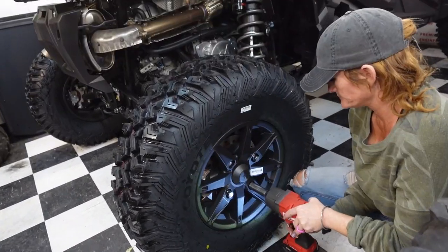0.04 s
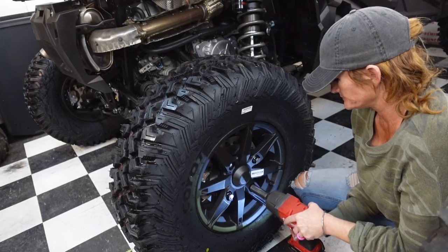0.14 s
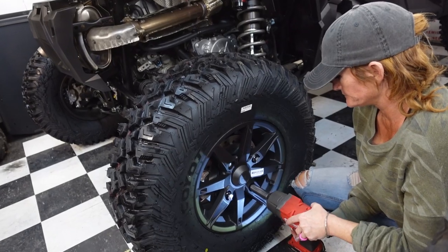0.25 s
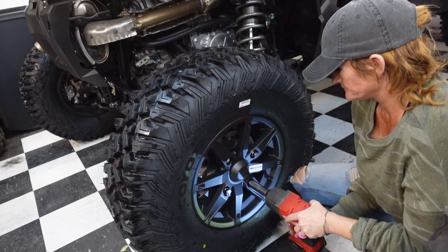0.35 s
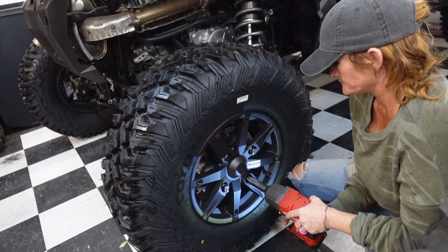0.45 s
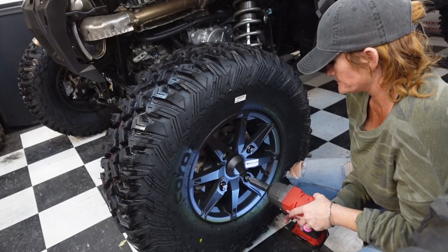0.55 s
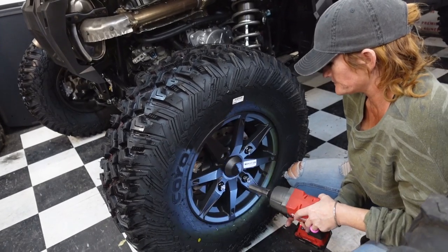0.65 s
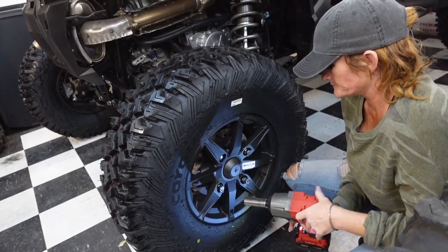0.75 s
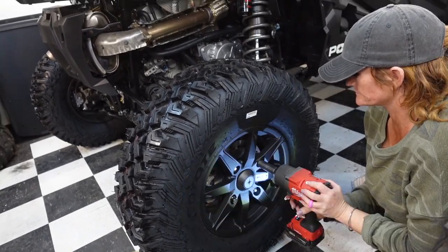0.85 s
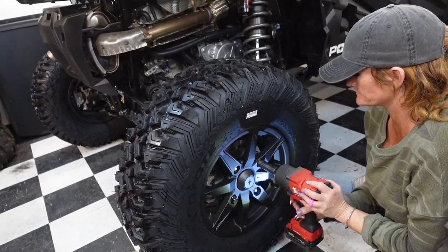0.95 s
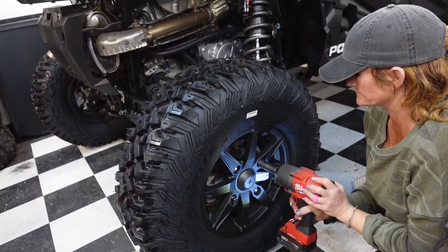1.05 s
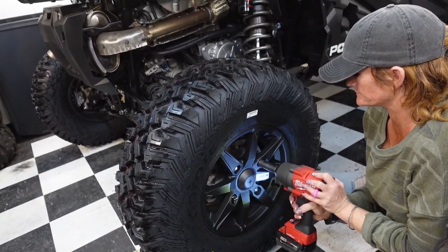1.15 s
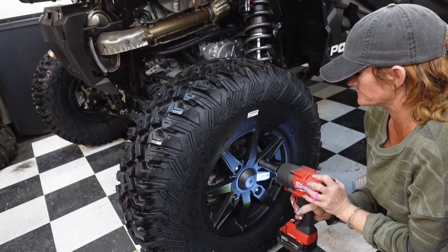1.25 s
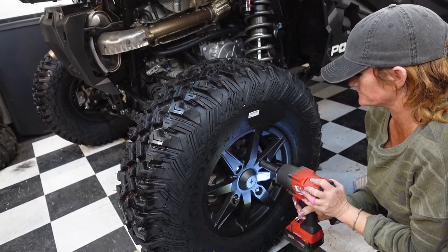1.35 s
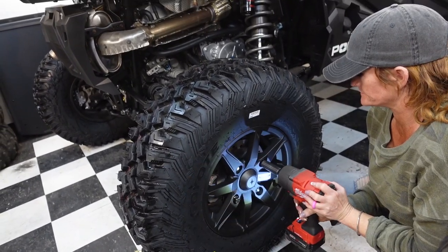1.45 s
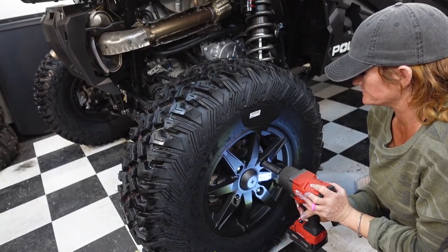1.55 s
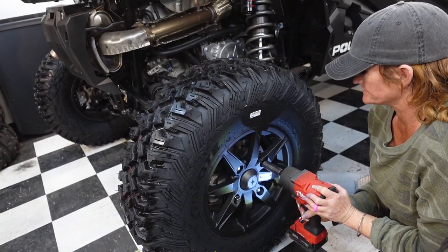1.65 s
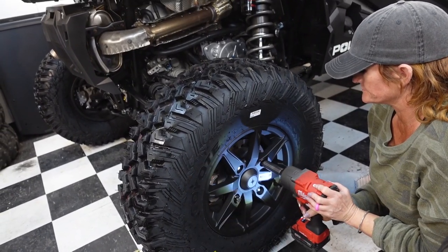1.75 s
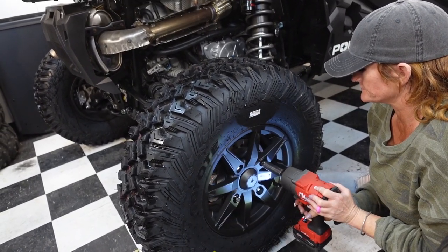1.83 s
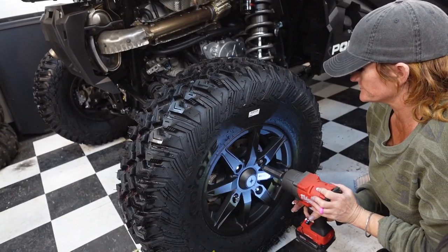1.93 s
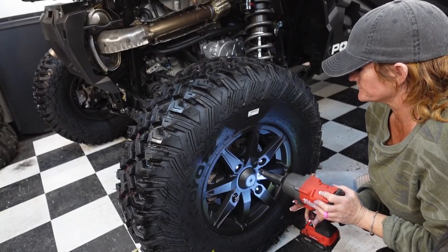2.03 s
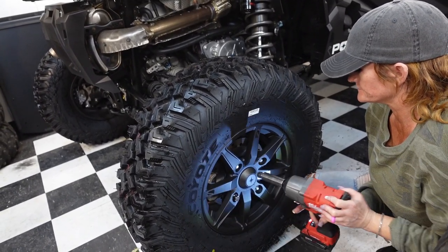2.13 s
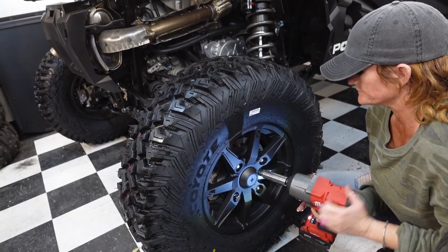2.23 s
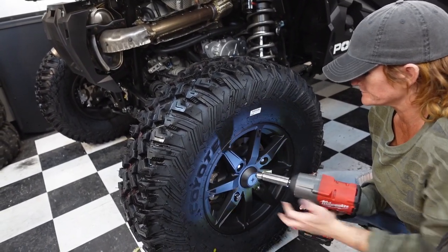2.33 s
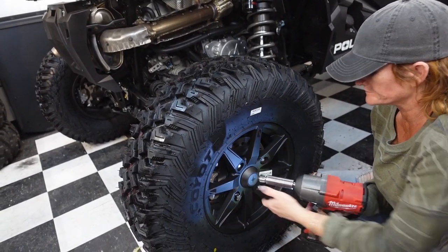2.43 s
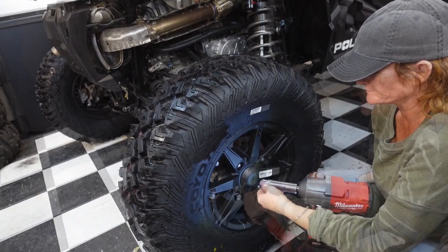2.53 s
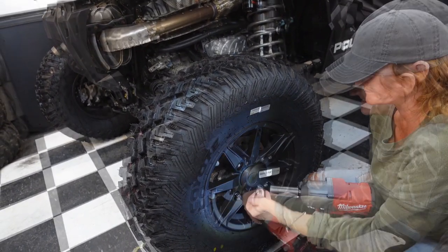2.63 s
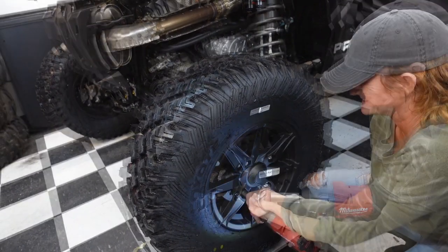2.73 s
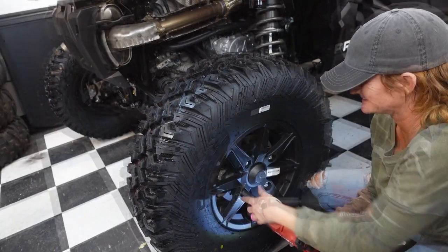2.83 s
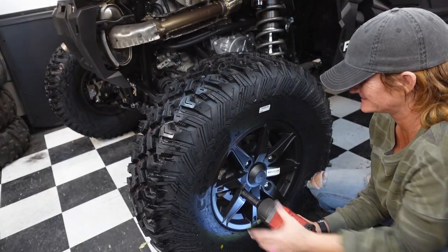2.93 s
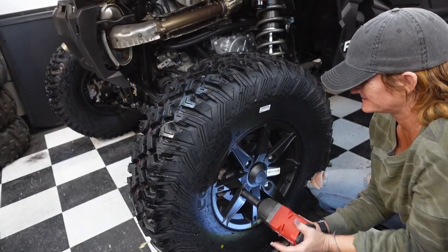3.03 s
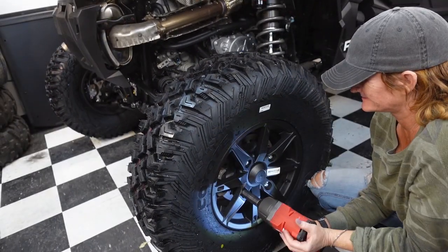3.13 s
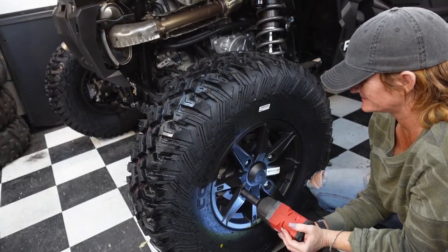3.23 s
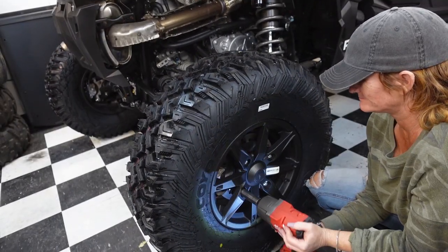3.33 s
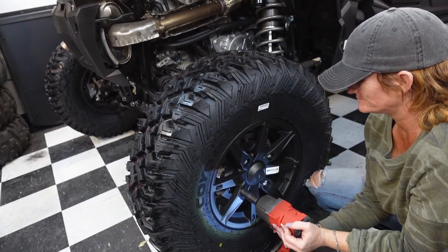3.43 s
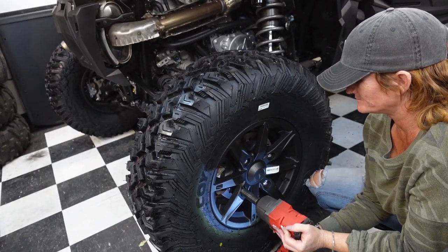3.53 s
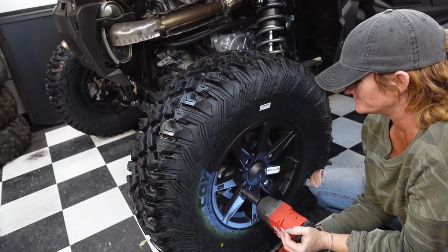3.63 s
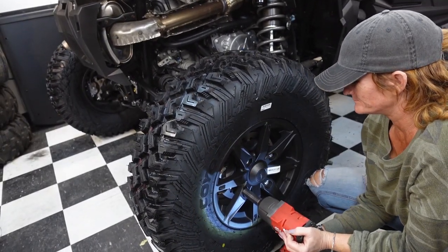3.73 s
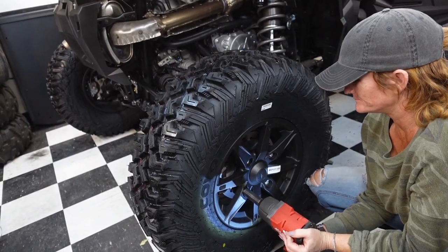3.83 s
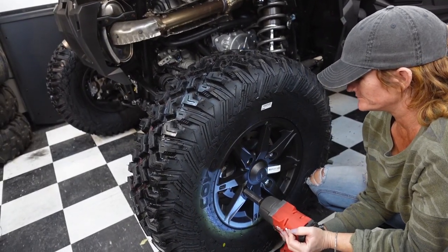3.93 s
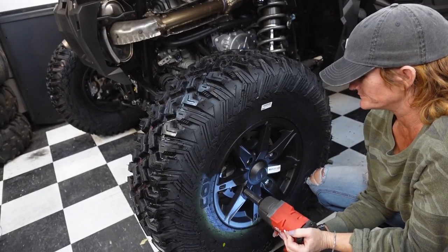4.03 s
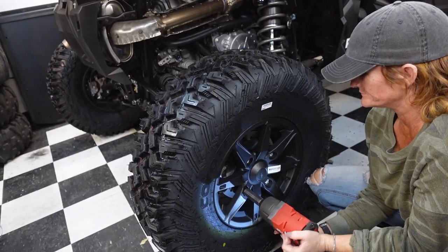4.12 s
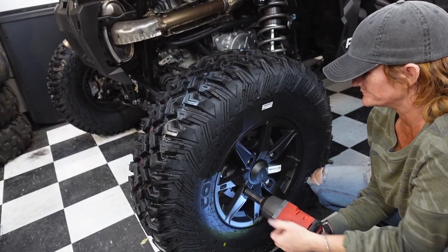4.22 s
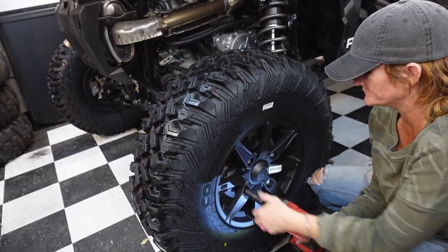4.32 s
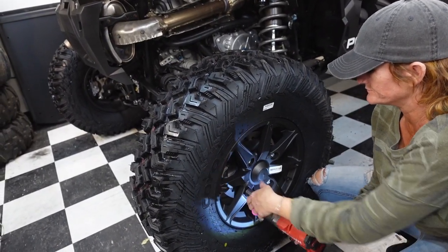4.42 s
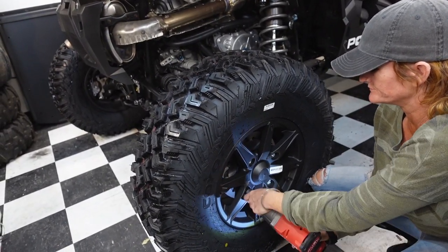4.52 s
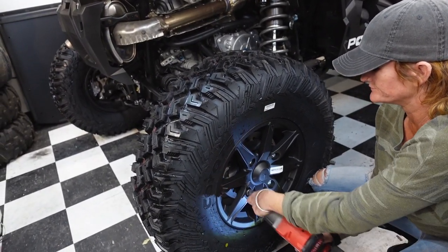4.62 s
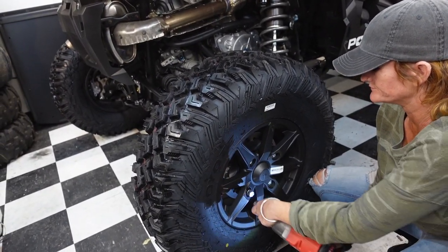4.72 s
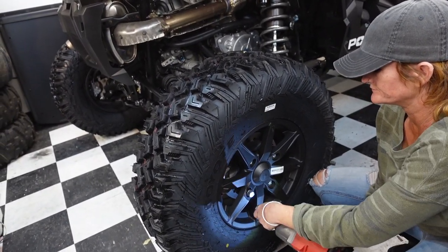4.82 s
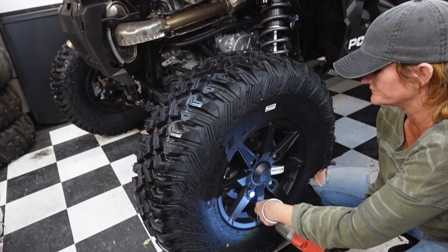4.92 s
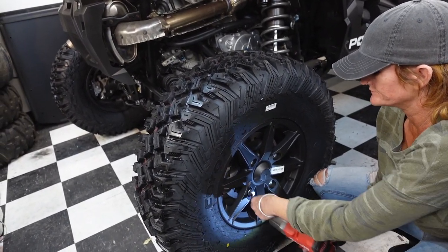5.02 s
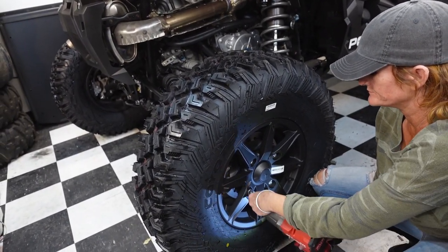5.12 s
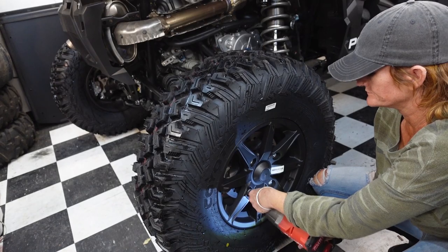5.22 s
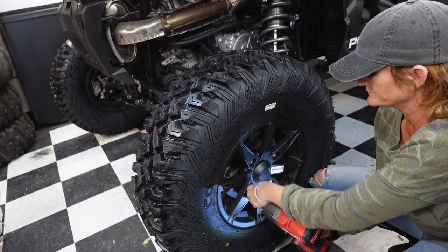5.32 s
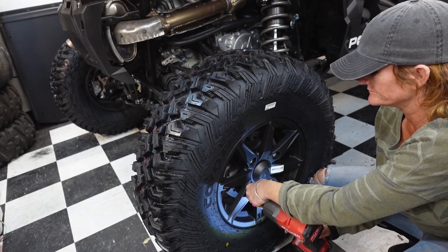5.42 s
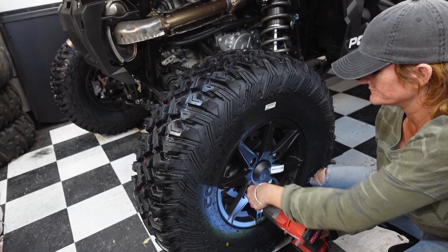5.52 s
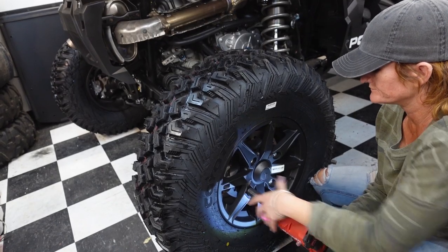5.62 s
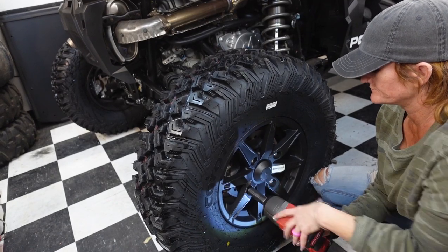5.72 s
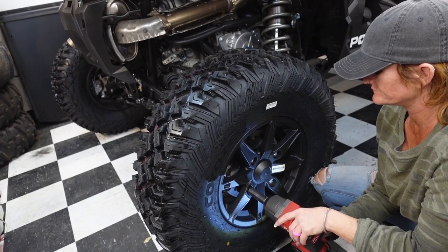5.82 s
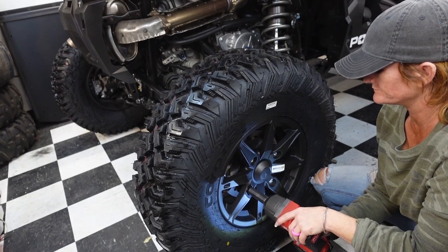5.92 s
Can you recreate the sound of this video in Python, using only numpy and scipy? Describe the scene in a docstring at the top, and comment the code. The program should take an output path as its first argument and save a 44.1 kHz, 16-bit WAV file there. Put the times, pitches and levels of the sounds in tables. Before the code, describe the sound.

A cordless wrench works on wheel nuts, recorded near in stereo with short hard-wall echo. Rapid steel hammering opens, turning to gear whirr and falling motor whine; another burst and spin follow. The tool stops, leaving faint room noise, wheel knocks and ringing nuts. It hammers once more, blips briefly and coasts down. After a faint tap, small clinks and a cluster of knocks, the motor spins up again just before the cut.

```python
"""A cordless impact wrench undoes lug nuts on an alloy wheel in a garage.
It starts already running: hammer beats, a freed nut whirring off, a spinning nut, then two more trigger pulls.
The first of these two hammers. A faint hum, knocks on the wheel and clinking loose nuts follow.
Then come a third hammered nut, a short pull, a soft tap, more clinks and knocks, and a last pull.
Motor and hum are sine tones; contacts are filtered noise or ringing modes; hard walls add echo."""
import sys
import numpy as np
from scipy import signal
from scipy.fft import rfft, irfft, next_fast_len
from scipy.io import wavfile
from scipy.ndimage import uniform_filter1d, map_coordinates

SR = 44100
rng = np.random.default_rng(int(sys.argv[2]) if len(sys.argv) > 2 else 0)


def file_out(sig):
    """Save sig as 16-bit WAV at sys.argv[1]."""
    # one column per channel
    cols = np.atleast_2d(sig).T
    # limit, then scale
    lim = np.clip(cols, -1, 1)
    pcm = np.round(lim * 32767).astype(np.int16)
    wavfile.write(sys.argv[1], SR, pcm)


N = 262937  # length in samples

# All levels in the tables are relative: the mix adds its own gains.
# Room tone: pitch_hz, level_db
AIR_SPECTRUM = [(24, -75.5), (40, -56), (110, -23.5), (290, -2), (516, -4), (1070, -3), (1270, -3.5),
                (1520, -4.5), (1950, -7.5), (2260, -6), (2980, -11.5), (4130, -12.5), (4680, -16),
                (7930, -26.5), (16000, -36.5)]
# The room tone is louder over these spans: start_s, end_s, level_db
ROOM_PAUSES = [(.866, .99, -46), (2.493, 3.29, -49), (5.093, 5.958, -56)]
# A hum lingers after the tool stops: start_s, end_s, level_db
LINGERING_HUMS = [(2.1, 2.478, -64), (4.05, 4.414, -60)]
# Sound from all around, difference between the ears against what they share: pitch_hz, level_db
STEREO_WIDTH = [(120, -48.5), (500, -13), (1200, -7), (2500, -6), (5000, -4), (12000, 0)]
# Echo of the garage: pitch_hz, time to fall 60 dB (t60_s)
GARAGE_DECAY = [(150, 0.79), (400, 0.57), (1000, 0.38), (2800, 0.36), (7000, 0.39), (15000, 0.29)]
# Tilt towards one ear, left minus right: pitch_hz, level_db
LEFT_RIGHT_LEAN = [(150, -3), (700, -0.5), (2000, -1.9), (4500, -2), (8000, -2.6), (12000, 0.6)]

# Trigger pulls: pressed_s, released_s, top_speed_hz, coasting_s, whine_db, drive_whistle_db,
# wheel_shake_db, gear_whirr_db, socket_rattle_db
TRIGGER_PULLS = [(-.3, .315, 663.3, 0.52, -29.5, -30, -42, -19, -22.5),
                 (1.002, 1.511, 642, 0.37, -33, -33.5, -48, -20, -30),
                 (1.699, 2.038, 731, 0.23, -22.5, -38, -50.5, -17, -26),
                 (3.282, 3.78, 600, .35, -28, -40, -49.5, -18, -26.5),
                 (3.943, 4.047, 682, .21, -29.5, -44, -37.5, -19, -28.5),
                 (5.803, 6, 760, .25, -23, -39, -41.5, -16.5, -27.5)]
# Hammering: first_blow_s, last_blow_s, blows_per_s, strength_db
HAMMER_BURSTS = [(0.009, 0.251, 40, -6.5), (1.055, 1.403, 34, 0), (3.332, 3.712, 35, -3)]
# A loosened nut runs down its thread: start_s, end_s, wheel_shake_db, gear_whirr_db, socket_rattle_db
NUT_RUN_OFFS = [(0.267, 0.409, -40, -16.5, -27.5), (1.39, 1.625, -34, -16.5, -22.5),
                (3.7, 3.868, -30.5, -15, -23)]
# Tones of the gears: multiple of the motor speed, level_db
GEAR_TONES = [(3.25, -1), (4, 0.5), (5, -20), (6.5, 8), (13, -4)]
# Resonances of the tool's housing: pitch_hz, level_db
HOUSING_RESPONSE = [(800, -35), (1900, -1), (2330, 3.5), (2550, 4.5), (2850, 5.5), (3300, -13), (3900, -3),
                    (4400, -21.5), (7200, -13), (7900, 6.5), (8600, -27)]
# Drive whistle beside the switching tone: multiple of the motor speed, level_db
DRIVE_SIDEBANDS = [(-2, -2), (-1, 2), (1, -0.5), (2, -19), (4, -12.5)]
# The gear case rings briefly around 2.8 kHz at these moments: peak_s, half_length_s, level_db
CASE_SWELLS = [(1.035, 0.025, -20.5), (1.62, 0.02, -19), (2.06, 0.033, -26), (3.315, 0.019, -17.5),
               (5.84, 0.021, -16.5)]
# A thin high whistle comes and goes: peak_s, half_length_s, level_db
THIN_WHISTLES = [(1.025, .02, -47), (1.095, .02, -46), (1.99, 0.057, -36), (2.12, 0.04, -32),
                 (2.68, .04, -55.5), (3.84, .04, -50)]
# Resonances of the gear case, then of the thin whistle: pitch_hz, width_hz, level_db
CASE_PEAKS = [(2830, 280, 0)]
THIN_PEAKS = [(15250, 90, -6.5), (15700, 200, 0)]
# Steel of the socket: pitch_hz, level_db
SOCKET_STEEL = [(530, -47.5), (900, -22.5), (1000, -25.5), (1150, 0.5), (1230, -11.5), (1340, -4.5),
                (1530, -2), (2120, -1), (4410, 2.5), (13200, -18.5), (14900, -25), (16000, -24)]
# Shaken wheel: pitch_hz, level_db
WHEEL_BODY = [(15, -75), (25, -55.5), (119, -30.5), (202, -17.5), (295, -16), (408, -9.5), (595, -10),
              (694, 1), (769, -5), (867, -1), (928, -9), (1140, -4), (1240, 0), (1330, -1), (1500, -9.5),
              (1950, -14), (3300, -120)]
# Whirring gearbox: pitch_hz, level_db
GEAR_WHIRR = [(240, -56), (400, -29.5), (933, -11.5), (1080, -7.5), (1430, -8), (1740, -5.5), (2120, -0.5),
              (2820, -2), (3520, -6.5), (3860, -6), (6170, -17), (8110, -20), (9000, -31), (11700, -34),
              (19800, -120)]

# The socket slaps on a nut: start_s, level_db, bright_part_db
SOCKET_SLAPS = [(0.354, -10, -24), (0.4028, -4, -24.5), (0.4279, -10.5, -20), (0.4581, -3.5, -21),
                (0.511, -16, -37), (0.55, 2.5, -17), (0.5707, -2.5, -18.5), (0.596, -3, -16),
                (0.622, -5, -27.5), (1.0104, -1.5, -31), (1.701, 0.5, -15), (1.7573, 0, -17.5),
                (1.9737, -8.5, -35.5), (2.0082, -14.5, -24.5), (2.0404, 2, -15), (2.0833, -1, -12),
                (2.1514, -3, -17), (2.1769, -2.5, -21), (2.2105, -7, -44), (3.2273, -20.5, -4),
                (3.2884, -4, -38), (3.369, 9.5, -30.5), (3.378, -2.5, -14.5), (3.8991, -3.5, -32),
                (3.9456, -4, -16), (3.9708, -1.5, -17.5), (4.151, -5.5, -31.5), (4.885, -32, -31),
                (4.901, -36, -41), (4.9566, -41, -35), (5.8047, -27.5, -29.5)]
# Dull, then bright part of a slap: pitch_hz, level_db
DULL_SLAP = [(240, -66), (400, -41.5), (1580, -6), (1820, 3.5), (2020, 0), (3210, 3.5), (5780, -6),
             (6540, -4.5), (13500, -34.5), (15300, -29.5), (16000, -35.5)]
BRIGHT_SLAP = [(3000, -35.0), (7000, 10.5), (11000, -0.5), (16000, -29)]
# A nut spins on freely: start_s, end_s, level_db
FREE_SPIN = (.64, .86, -42)
# The nut scraping on its thread: pitch_hz, width_hz, level_db
THREAD_SQUEAL = [(1600, 340, 5), (4020, 1400, -4.5), (8000, 600, -17)]

# Tool and socket knock on the wheel: start_s, level_db, thump_db, clatter_t60_s, socket_ring_db
WHEEL_KNOCKS = [(2.546, -18.5, -28.5, 0.11, -5), (2.574, -20, -21.5, 0.21, -19),
                (2.596, -15, -23, 0.088, -9), (2.64, -23.5, -20, 0.17, -9.5), (3.361, -2.5, -37, .06, -31),
                (3.789, -20.5, -12.5, .1, -22), (5.142, -10.5, -45, 0.2, -18), (5.168, -10, -29, .11, -27),
                (5.205, -16, -30, 0.22, -21), (5.293, -17, -34, 0.14, -18), (5.323, -11, -39, 0.13, -23),
                (5.403, -2, -33, 0.092, -44)]
# Ringing alloy wheel: pitch_hz, level_db, t60_s
WHEEL_MODES = [(672, -3.5, 0.19), (1102, -7.5, 0.25), (1330, -6, 0.9), (1980, -14, .2), (3010, -6.5, 0.18),
               (3640, -5, 0.18), (5740, -13, .16)]
# The long socket ringing freely: pitch_hz, level_db, t60_s
SOCKET_MODES = [(1720, 4, 0.23), (2350, -5.5, 0.2), (3460, -2, 0.18)]
# A soft tap on the rim: start_s, level_db
RIM_TAP = (4.564, -50.5)
# What the soft tap rings: pitch_hz, level_db, t60_s
RIM_MODES = [(1110, 1, 0.13), (1992, -13, .06)]
# Clatter of a knock, then thump of the tyre: pitch_hz, level_db
KNOCK_CLATTER = [(120, -74), (200, -48.5), (283, -24.5), (590, -21), (683, -1.5), (749, -13.5), (1350, 1),
                 (1530, -6), (2050, -2), (2380, -4), (5730, -15), (7270, -25), (16000, -49.5)]
TYRE_THUMP = [(24, -64), (40, -52), (136, -8), (253, -3.5), (278, 2), (614, -5), (700, -28), (910, -10),
              (1540, -120)]
# Loose nuts clink: start_s, level_db, ring_db, strike place (0 on the rim to 1 on the flank)
NUT_CLINKS = [(2.65, -17, -8.5, 0.71), (2.757, -21.5, 0, 0.5), (2.823, -19, 2, 0.84),
              (2.850, -21.5, -17, 0.35), (4.601, -27.5, 3.5, 0.17), (4.687, -25.5, 6.5, 1),
              (4.7057, -34.5, 4.5, 1)]
# A ringing lug nut: pitch_hz, struck_on_rim_db, struck_on_flank_db, t60_s
NUT_MODES = [(3359, -7, -17.5, 0.5), (3660, -22, -15, 0.16), (4500, -15, -8, .17), (4830, -16, 0, 0.08),
             (4930, -21, -1, .15), (6380, -0.5, 0, 0.14), (7080, -15.5, 5.5, 0.154), (10260, 4, -24, .25),
             (11350, -15, -3, 0.2), (14810, -10, -18, 0.19)]
# Tick of a clink, then the steel that it strikes: pitch_hz, level_db
CLINK_TICK = [(500, -26), (2000, 4.5), (4600, -0.5), (8000, -2.0), (16000, -25.5)]
STRUCK_STEEL = [(1500, -24), (3200, -13.5), (4400, -1.5), (5100, -8.5), (5700, -28.5), (12000, -34.0)]

TOP_HZ = 16000  # nothing sounds above this
ROOM_DB = -60  # room tone at its quietest
# Time to gather speed; friction ends the coasting as if it aimed this far below zero
SPIN_UP_S, FRICTION_HZ = .07, 200.6
HAMMER_DRAG = .2  # share of its speed that the motor loses while hammering
# Noise sets in this fast, and dies with this power of the speed when coasting
TRIGGER_S, COAST_POWER = 0.024, 1.77
WHINE_POWER = 6.5  # the whine grows with this power of the speed
# The drive stops whistling near full speed
FULL_DRIVE_HZ, DRIVE_FADE_DB_PER_HZ = 694, .45
LOAD_WHINE_DB, LOAD_DRIVE_DB = -11, -18  # hammering weakens both tones
# Gears sing while they turn a loosened nut: level at this speed, softer as they slow
RUN_WHINE_DB, RUN_WHINE_HZ = -27.5, 590
HAMMER_SHAKE_DB, HAMMER_RATTLE_DB = -34, -20.5  # wheel and socket under the blows
BITE_DB, BITE_S = -28, 0.023  # the first blows meet a tight nut and shake the wheel hardest
THREAD_FADE_S = 0.19  # the socket's rattle eases as the nut runs out


def amp(db):
    """Turn decibels into gain."""
    return 10 ** (np.asarray(db) / 20)


def unit(x):
    """Scale to an rms of 1."""
    return x / np.sqrt(np.mean(x ** 2) + 1e-20)


def along(points, hz):
    """Read a curve of (pitch, value) points on a log pitch axis."""
    pitch, value = np.transpose(points)
    return np.interp(np.log(hz + 1), np.log(pitch + 1), value)


def wobble(rate):
    """Draw a smooth random curve with this many knots a second."""
    knots = rng.standard_normal(int(N * rate / SR) + 4)
    return map_coordinates(knots, [np.arange(N) * rate / SR])


def filtered(x, response):
    """Multiply the spectrum of x by a response of frequency."""
    size = next_fast_len(x.shape[-1] + SR // 4)
    spectrum = rfft(x, size) * response(np.fft.rfftfreq(size, 1 / SR))
    return irfft(spectrum, size)[..., :x.shape[-1]]


def coloured(x, spectrum, size=4096):
    """Pass x through a filter of energy 1 with this spectrum, which never sounds early."""
    gain = amp(along(spectrum, np.fft.rfftfreq(size, 1 / SR)))
    cepstrum = irfft(np.log(gain + 1e-6))
    # folding the cepstrum puts the filter's energy at its start
    cepstrum[1:size // 2] *= 2
    cepstrum[size // 2 + 1:] = 0
    kernel = irfft(np.exp(rfft(cepstrum)))
    return signal.fftconvolve(x, kernel / np.linalg.norm(kernel))[:len(x)]


def add(track, s, sound):
    """Mix a sound into a track at time s."""
    part = track[max(0, round(s * SR)):][:len(sound)]
    part += sound[:len(part)]


def fade(t60):
    """Half a second of dying away, falling 60 dB in t60 seconds."""
    return np.exp(-np.log(1000) * np.arange(SR // 2) / SR / t60)


def crack(t60):
    """The dense ring of one contact: noise that dies away."""
    return fade(t60) * rng.standard_normal(SR // 2)


def ring(modes, scatter_db):
    """Strike a set of dying sine tones, each a little louder or softer every time."""
    t = np.arange(SR // 2) / SR
    total = 0
    for hz, db, t60 in modes:
        gain = amp(db + scatter_db * rng.normal())
        total = total + gain * fade(t60) * np.sin(2 * np.pi * (hz * t + rng.random()))
    return total


def narrow(peaks):
    """Noise of rms 1 in a few resonances."""
    def gain(f):
        return sum(amp(db) / (1 + (2 * (f - hz) / width) ** 2) for hz, width, db in peaks)
    return unit(filtered(rng.standard_normal(N), gain))


def swells(rows):
    """Add up bell-shaped swells."""
    t = np.arange(N) / SR
    return sum(amp(db) * np.exp(-((t - s) / half) ** 2) for s, half, db in rows)


def gate(start, end, attack_s, release_s):
    """An envelope that rises at start, holds, and dies away after end."""
    t = np.arange(N) / SR
    rise = 1 - np.exp(-np.maximum(t - start, 0) / attack_s)
    return rise * np.exp(-np.maximum(t - end, 0) / release_s)


def diffuse(mid, side):
    """Sound from all around: alike in both ears in the bass, less so in the treble."""
    side = filtered(side, lambda hz: amp(along(STEREO_WIDTH, hz)))
    return np.array([mid + side, mid - side])


def background(hum_hz):
    """Room noise that is louder over some spans, and a faint wavering hum after the tool stops."""
    air = diffuse(*(coloured(noise, AIR_SPECTRUM) for noise in rng.standard_normal((2, N))))
    level = amp(ROOM_DB) + sum(amp(db) * gate(start, end, attack_s=.025, release_s=.1)
                               for start, end, db in ROOM_PAUSES)
    drift = amp(1.3 * wobble(19))
    linger = sum(amp(db) * gate(start, end, attack_s=0.018, release_s=.09)
                 for start, end, db in LINGERING_HUMS)
    hum = linger * np.sin(2 * np.pi * hum_hz * np.arange(N) / SR + 0.33 * wobble(16))
    return level * drift * air + hum


def load():
    """How hard the hammer works: near 1 while it beats, 0 while the anvil turns freely."""
    return sum(gate(first, last, attack_s=.006, release_s=.06) for first, last, _, _ in HAMMER_BURSTS)


def running():
    """A pull spins the motor up, hammering drags it, release lets it coast: speed and five gains."""
    t, drag = np.arange(N) / SR, 1 - HAMMER_DRAG * load()
    speed, gains = np.zeros(N), np.zeros((5, N))
    for on, off, top_hz, coast_s, *levels_db in TRIGGER_PULLS:
        approach = np.exp(-np.maximum(t - on, 0) / SPIN_UP_S)
        driven = drag * (top_hz + (np.interp(on, t, speed) - top_hz) * approach)
        last_hz = np.interp(off, t, driven)
        slowing = np.exp(-np.maximum(t - off, 0) / coast_s)
        coast = np.maximum((last_hz + FRICTION_HZ) * slowing - FRICTION_HZ, 0)
        speed = np.where(t < on, speed, np.where(t < off, driven, coast))
        noise = gate(on, np.inf, TRIGGER_S, TRIGGER_S) * (coast / last_hz) ** COAST_POWER
        whine = np.minimum(speed / top_hz, 1) ** WHINE_POWER
        full_drive_fade = amp(-DRIVE_FADE_DB_PER_HZ * np.maximum(speed - FULL_DRIVE_HZ, 0))
        drive = gate(on, off, TRIGGER_S, TRIGGER_S) * full_drive_fade
        pull_gains = amp(levels_db)[:, None] * [whine, drive, noise, noise, noise]
        gains = np.where(t < on, gains, pull_gains)
    return speed, gains


def motor(switching_hz, flutter, rough_db):
    """Gear tones sweep through the housing's resonances; the drive whistles around its switching tone."""
    speed, (whine_gain, drive_gain, *_) = running()
    hammering = load()
    run_gate = sum(gate(start, end, attack_s=0.084, release_s=0.029) for start, end, *_ in NUT_RUN_OFFS)
    run_gain = amp(RUN_WHINE_DB) * (speed / RUN_WHINE_HZ) ** 2 * run_gate
    # the motor runs smoothest near full speed
    labour = np.clip((680 - speed) / 200, 0, 1)
    unsteady = flutter + .021 * labour
    speed = np.abs(speed * (1 + unsteady * wobble(220)))
    turn = 2 * np.pi * np.cumsum(speed) / SR
    whine = sum(amp(db + along(HOUSING_RESPONSE, k * speed) + rough_db * wobble(110)) * np.sin(k * turn)
                for k, db in GEAR_TONES)
    whine_gain = whine_gain * amp(LOAD_WHINE_DB * hammering) + run_gain
    carrier = 2 * np.pi * switching_hz * np.arange(N) / SR
    whistle = sum(amp(db) * np.sin(carrier + k * turn) for k, db in DRIVE_SIDEBANDS)
    drive_gain = drive_gain * amp(LOAD_DRIVE_DB * hammering + 0.5)
    turning = np.clip((speed - 50) / 80, 0, 1)  # the case falls silent when the motor stops
    case = turning * swells(CASE_SWELLS) * narrow(CASE_PEAKS)
    thin = swells(THIN_WHISTLES) * narrow(THIN_PEAKS)
    return whine_gain * whine + drive_gain * whistle + case + thin


def chatter(rate, spread_db, t60):
    """Power of random steel-on-steel contacts, averaging 1; rate is contacts a second."""
    contacts = (rng.random(N) < rate / SR) * amp(spread_db * rng.standard_normal(N)) ** 2
    power = np.abs(signal.fftconvolve(contacts, fade(t60) ** 2)[:N])
    return power / power.mean()


def hammer(blow_db, rebound_db, rebound_s, t60):
    """Power of the blows; after each the anvil rebounds twice in the socket."""
    power = np.zeros(N)
    for first, last, rate, db in HAMMER_BURSTS:
        for s in np.arange(first, last, 1 / rate):
            blow_gain = amp(db + blow_db + 3.1 * rng.normal())
            add(power, s, (blow_gain * fade(t60)) ** 2)
            for k in (1, 2):
                rebound_at = s + k * rebound_s + 0.0011 * rng.normal()
                rebound_gain = amp(db + rebound_db + 2 * rng.normal())
                add(power, rebound_at, (rebound_gain * fade(t60)) ** 2)
    return power


def effort():
    """Wheel shake, gear whirr and socket rattle: tool, hammering and running nut add in power."""
    power, hammering = running()[1][2:] ** 2, load()
    bite = sum(gate(first, first, attack_s=0.0021, release_s=BITE_S) for first, _, _, _ in HAMMER_BURSTS)
    power[0] += (amp(HAMMER_SHAKE_DB) * hammering + amp(BITE_DB) * bite) ** 2
    power[2] += (amp(HAMMER_RATTLE_DB) * hammering) ** 2
    for start, end, *levels_db in NUT_RUN_OFFS:
        run = gate(start, end, attack_s=0.028, release_s=0.017)
        easing = 2 * gate(start, start, attack_s=0.015, release_s=THREAD_FADE_S)
        power += (amp(levels_db)[:, None] * [run, run, run * easing]) ** 2
    return np.sqrt(power)


def wrench():
    """Blows and rattle ring the socket and shake the wheel; the gearbox whirrs beneath."""
    shake, whirr, rattle = effort()
    # loose contacts and blows together make the exciting force
    loose = chatter(rate=800, spread_db=3.5, t60=0.01)
    blows = hammer(blow_db=7.0, rebound_db=2.5, rebound_s=.007, t60=0.02)
    force = np.sqrt(.5 * loose + blows)
    socket = amp(0.5) * rattle * coloured(force * rng.standard_normal(N), SOCKET_STEEL)
    wheel = amp(5.0) * shake * coloured(force * rng.standard_normal(N), WHEEL_BODY)
    teeth = np.sqrt(chatter(rate=1200, spread_db=4, t60=0.017))
    gears = amp(-5.0) * whirr * coloured(teeth * rng.standard_normal(N), GEAR_WHIRR)
    return socket + wheel + gears


def slaps():
    """Single sharp contacts of the socket on a nut: dying noise with a dull and a bright part."""
    dull, bright = np.zeros((2, N))
    for s, db, bright_db in SOCKET_SLAPS:
        add(dull, s, amp(db - 9.5) * crack(0.028))
        add(bright, s, amp(db + bright_db - 3.5) * crack(0.028))
    return coloured(dull, DULL_SLAP) + coloured(bright, BRIGHT_SLAP)


def coasting():
    """A spinning nut scrapes on its thread and sings in a few broad resonances."""
    start, end, db = FREE_SPIN
    return amp(db) * gate(start, end, attack_s=0.015, release_s=.004) * narrow(THREAD_SQUEAL)


def knocks():
    """Heavy contacts clatter, ring wheel and socket and thump the tyre; a soft tap rings the rim."""
    clatter, ringing, tyre = np.zeros((3, N))
    for s, db, thump_db, t60, socket_db in WHEEL_KNOCKS:
        add(clatter, s, amp(db - 12.5) * crack(t60))
        add(ringing, s, amp(db - 37) * ring(WHEEL_MODES, scatter_db=4.5))
        add(ringing, s, amp(db + socket_db - 12) * ring(SOCKET_MODES, scatter_db=1))
        add(tyre, s, amp(db + thump_db - 2.5) * crack(0.18))
    tap_s, tap_db = RIM_TAP
    add(ringing, tap_s, amp(tap_db) * ring(RIM_MODES, scatter_db=1))
    return coloured(clatter, KNOCK_CLATTER) + ringing + coloured(tyre, TYRE_THUMP)


def clinks():
    """A tick, the bright ring of a loose nut, and a dense ring of the steel that it strikes."""
    ticks, rings, struck = np.zeros((3, N))
    for s, db, ring_db, place in NUT_CLINKS:
        # the strike place blends the rim and flank levels
        modes = [(hz, rim_db + place * (flank_db - rim_db), t60) for hz, rim_db, flank_db, t60 in NUT_MODES]
        add(ticks, s, amp(db - 12.0) * crack(0.023))
        add(rings, s, amp(db + ring_db - 23) * ring(modes, scatter_db=3.0))
        add(struck, s, amp(db - 22.0) * crack(0.28))
    return coloured(ticks, CLINK_TICK) + rings + coloured(struck, STRUCK_STEEL)


def garage(x, gap_s, count=16):
    """Hard floor and walls: a short dense echo, drawn afresh for each overlapping piece."""
    out = np.zeros((2, N + SR))
    hop = N // count + 1
    padded = np.pad(x, (hop, 2 * hop))
    for k in range(count + 1):
        # the echo is noise whose pitches die at their own rates
        hz, t, z = signal.stft(rng.standard_normal((2, SR // 2)), SR, nperseg=256)
        decay = np.exp(-np.log(1000) * t / along(GARAGE_DECAY, hz)[:, None])
        tail = signal.istft(z * decay, SR, nperseg=256)[1]
        build_up = 1 - np.exp(-np.arange(tail.shape[1]) / SR / gap_s)
        tail = diffuse(*(tail * build_up))
        piece = padded[k * hop:][:2 * hop] * signal.windows.cosine(2 * hop)
        for track, response in zip(out, tail / np.linalg.norm(tail[0])):
            add(track, k * hop / SR, signal.fftconvolve(piece, response))
    return out[:, hop:hop + N]


def scene():
    """Mix the direct sounds with their garage echo and the background, leaning mostly to the right."""
    tool = wrench() + slaps()
    tones = motor(switching_hz=7780, flutter=0.0064, rough_db=4.0) + coasting()
    handling = knocks() + clinks()
    direct = amp(0.5) * tool + amp(2.5) * tones + amp(3.0) * handling
    tool_echo = garage(amp(-3.5) * tool + amp(-7.5) * tones, gap_s=0.002)
    handling_echo = amp(1.0) * garage(handling, gap_s=0.0038)
    both = direct + (tool_echo + handling_echo) + background(hum_hz=344)
    return filtered(both, lambda hz: amp(np.outer([.5, -.5], along(LEFT_RIGHT_LEAN, hz))))


def record(dry, input_db=1.0, limit_db=-14.5, window_s=0.004):
    """A limiter holds loud bursts level; a filter thins the deep bass and cuts the top treble."""
    x = amp(input_db) * dry
    window = int(window_s * SR)
    power = np.abs(uniform_filter1d(np.mean(x ** 2, axis=0), window))
    gain = (1 + (power / amp(limit_db) ** 2) ** 2) ** (-1 / 4)
    limited = x * uniform_filter1d(gain, window)
    return filtered(limited, lambda hz: (hz < TOP_HZ) * hz / np.hypot(hz, 35))


dry = scene()
out = record(dry)
file_out(out)
```